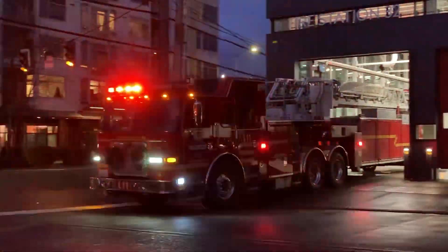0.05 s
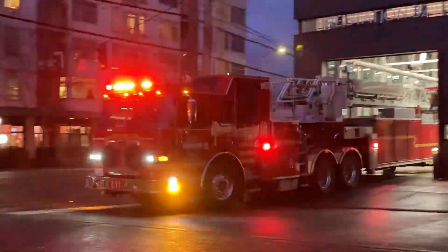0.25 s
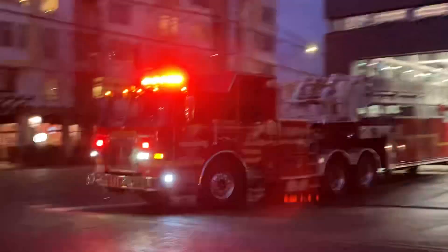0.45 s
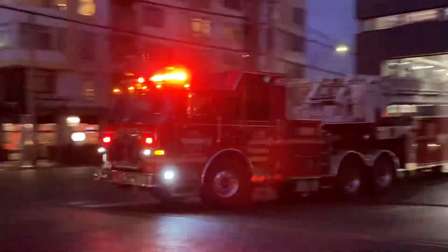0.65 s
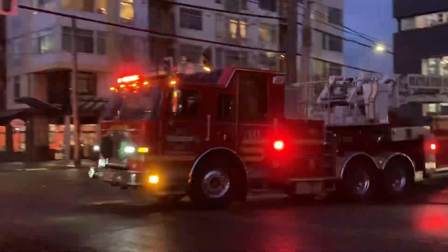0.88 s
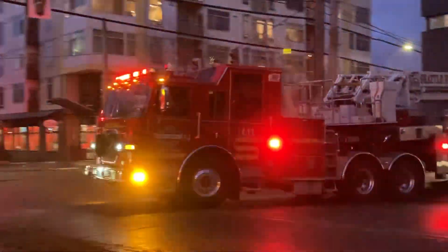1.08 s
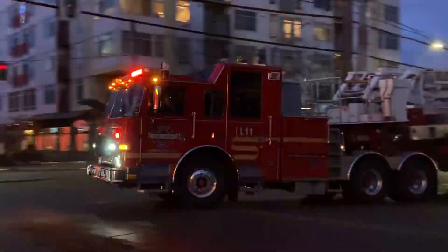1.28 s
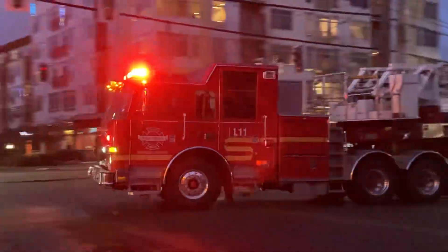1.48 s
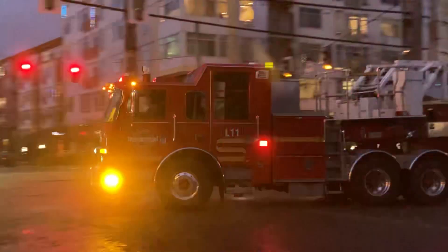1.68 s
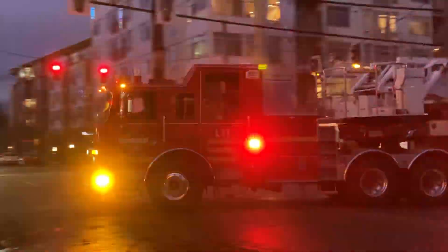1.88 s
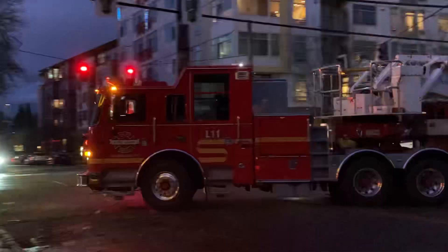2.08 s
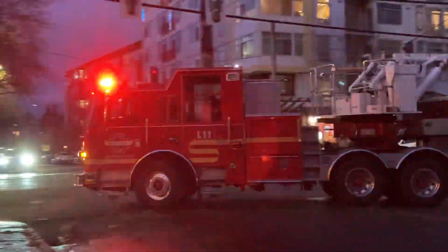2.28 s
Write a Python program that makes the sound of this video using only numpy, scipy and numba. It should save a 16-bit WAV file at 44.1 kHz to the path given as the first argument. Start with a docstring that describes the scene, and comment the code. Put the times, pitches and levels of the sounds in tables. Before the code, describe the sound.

Two short, loud fire truck horn honks echo over engine rumble and wet road hiss.

```python
"""Two short blasts on a chord of three air horns, the first opening with a squeak: a fire truck pulls out.
One air valve sets three reeds buzzing; they start sharp and raspy, and their clash makes the treble throb.
House fronts across the street throw each blast back. Underneath, the diesel rumbles and the tyres hiss
on the wet road, ducked by an automatic gain control whenever the horns sound."""
import sys
import numpy as np
from scipy import signal
from scipy.fft import rfft, irfft, next_fast_len
from scipy.io import wavfile
from scipy.ndimage import uniform_filter1d, map_coordinates
from numba import njit

SR = 44100
rng = np.random.default_rng(int(sys.argv[2]) if len(sys.argv) > 2 else 0)


def pcm_store(signal):
    """Save signal as 16-bit PCM."""
    levels = np.round(np.clip(np.atleast_2d(signal), -1, 1) * 32767)
    wavfile.write(sys.argv[1], SR, levels.astype(np.int16).T)


N = 108045
TOP_HZ = 15850

# horn cues: start/s, end/s, level/dB, attack/s, treble opening/s, left lead/ms, left over right/dB
BLAST_CUES = [(.236, .44, -12, 0.015, 0.025, 0.15, 2.5), (1.6, 1.88, -10, 0.02, 0.023, 0.408, 1.5)]
def horns():
    """Each blast arrives directly, off the house fronts, off road and cab, and as a wash down the street."""
    out = np.zeros((2, N))
    for i, (start, end, db, attack_s, open_s, lead_ms, left_db) in enumerate(BLAST_CUES):
        direct = amp(db) * placed(blast(i, start, end - start, attack_s, open_s), start)
        if i == 0:
            direct += squeak()
        out += panned(direct, lead_ms, left_db) + house_echoes(direct, i) + street_wash(direct)
    return out


RELEASE_S, ROUGH_S = .015, .11
THROB_HZ, THROB_DEPTH = 33, [.42, .24]  # one depth per blast
# lead horn's bend in each blast, sharp at first, sagging under full pressure: t/s, f/Hz
LEAD_BEND = [
    [(.25, 268.3), (.29, 265.4), (.33, 257.5), (.39, 253.3), (.45, 255.6)],
    [(1.62, 269), (1.65, 265), (1.69, 255), (1.75, 251), (1.815, 250.1), (1.875, 253.4), (1.9, 256.7)],
]
# lead horn's body, facing the listener in the first blast, side-on in the second: harmonic, level/dB
LEAD_BODY = [
    [(1, 0.5), (2, -3.5), (3, 0.5), (4, -9.5), (5, -15), (6, -27), (7, -21.5), (8, -16.5), (9, -8.5),
     (10, -10), (12, -16), (14, -16.5)],
    [(1, 1), (2, 0), (3, -3), (4, -9), (5, -11), (6, -14.5), (7, -12.5), (8, -12), (9, -16.5), (10, -15),
     (11, -17.5), (12, -27), (14, -22.5)],
]
# lead horn's top end: harmonic, level/dB
LEAD_TOP = [(16, -22), (20, -29.5), (23, -31), (28, -29.5), (33, -34.5), (37, -55), (44, -28.5), (62, -63)]
# bite of each blast: hiss/dB, share of opening blare and rasp, side horns' tilt/(dB per octave)
BITE = [(-14.5, 0.64, 0.3), (-21.5, 0.7, -0.17)]
def blast(i, start, length_s, attack_s, open_s):
    """One valve drives three reeds, rough at first; the clashing horns make the treble throb."""
    hiss_db, blare, tilt_db = BITE[i]
    t = np.arange(int((length_s + .15) * SR)) / SR
    closing = np.exp(-np.maximum(t - length_s, 0) / RELEASE_S)
    pressure = (1 - np.exp(-(t / attack_s) ** 2)) * closing
    opening = (1 - np.exp(-t / open_s)) * closing ** .19
    unrest = 1 + 4 * np.exp(-t / ROUGH_S)
    lead_hz = curve(LEAD_BEND[i], start + t)[0]
    lead_tone = list(LEAD_BODY[i]) + LEAD_TOP
    lead, lead_phase = reed(lead_hz, lead_tone, opening, unrest, blare, scatter_rad=.61)
    sides, high_phase = side_horns(i, t, opening, unrest, blare, tilt_db)
    chord = lead + sides + opening * sum_tones(i, lead_phase, high_phase)
    air = reed_air(t, lead_phase, amp(hiss_db) * opening * np.sqrt(unrest), blare)
    out = pressure * (chord + air)
    treble = filtered(out, lambda hz: along([(1000, 0), (2200, 1)], hz))
    return out + THROB_DEPTH[i] * np.cos(2 * np.pi * THROB_HZ * t) * treble


JITTER, FLUTTER = .0012, .15
BLARE_S, BUILD_S, DULL_HZ = .067, .035, 1500
# brassy lift on a starting reed, at full blare: f/Hz, boost/dB
BLARE_EQ = [(430, 2.5), (550, 6.5), (800, 4), (1050, 18.5), (1350, 7.5), (1600, 16), (1900, 3), (2200, 7),
            (3000, -3.5)]
def reed(hz, tone, opening, unrest, blare, scatter_rad):
    """A reed buzzes in fluttering harmonics on an unsteady pitch, dull while half open; gives sound, phase."""
    size = len(hz)
    t = np.arange(size) / SR
    phase = phase_of(hz * (1 + JITTER * unrest * wobble(174.2, size)))
    starting = blare * np.exp(-(t / BLARE_S) ** 2)
    out = np.zeros(size)
    for k in range(1, int(TOP_HZ / hz.mean())):
        harmonic_hz = k * hz.mean()
        gain = amp(along(tone, k) + starting * along(BLARE_EQ, harmonic_hz))
        gain *= opening ** (harmonic_hz / DULL_HZ)
        if k == 1:  # the lowest note takes time to build in the bell
            gain *= 1 - np.exp(-t / BUILD_S)
        flutter = FLUTTER * (unrest if k > 3 else 1) * wobble(45.4, size)
        offset = scatter_rad * min(k - 1, 1) * rng.normal()
        out += gain * (1 + flutter) * np.sin(k * phase + offset)
    return np.sqrt(2) * out, phase


SIDE_SHARP, SETTLE_S = .0078, .04
# colour of the low horn: harmonic, level/dB
LOW_TONE = [(1, -6), (2, -11.5), (3, -15), (4, -15.5), (5, -17), (7, -32.5), (11, -25.5), (18, -48),
            (30, -46), (70, -72)]
# colour of the high horn: harmonic, level/dB
HIGH_TONE = [(1, -26.5), (2, -18), (3, -18.5), (5, -28), (9, -23), (15, -38.5), (28, -36), (56, -77)]
# outer notes of the chord in each blast: low f/Hz, low level/dB, high f/Hz, high level/dB
SIDE_NOTES = [(215.3, -0.5, 281, -0.5), (213.9, 1.5, 282, -2.5)]
def side_horns(i, t, opening, unrest, blare, tilt_db):
    """Reeds below and above the lead start sharp and settle; gives their sound and the high one's phase."""
    low_hz, low_db, high_hz, high_db = SIDE_NOTES[i]
    sharp = 1 + SIDE_SHARP * np.exp(-t / SETTLE_S)
    out = np.zeros(len(t))
    for hz, db, tone in [(low_hz, low_db, LOW_TONE), (high_hz, high_db, HIGH_TONE)]:
        tilted = [(k, level + tilt_db * np.log2(k)) for k, level in tone]
        drift = 1 + .00303 * wobble(13.5, len(t))
        horn, phase = reed(hz * sharp * drift, tilted, opening, 1.21 * unrest, blare, scatter_rad=1.1)
        out += amp(db) * horn
    return out, phase


# sum tones: multiple of the lead horn, multiple of the high horn
SUM_MULTIPLES = [(1, 1), (1, 2), (2, 2), (4, 1)]
# their mix in each blast: level/dB per sum tone
SUM_MIX = [(2, 0, -12.5, -15.5), (0.23, -9.5, -21, -21)]
def sum_tones(i, lead_phase, high_phase):
    """The lead and high horns share their air and sound at sums of their harmonics."""
    return np.sqrt(2) * sum(amp(db) * np.sin(m * lead_phase + n * high_phase)
                            for (m, n), db in zip(SUM_MULTIPLES, SUM_MIX[i]))


RASP_DB, RASP_S = -8, .1
# colour of the air hiss: f/Hz, level/dB
HISS_EQ = [(200, -48), (700, 9), (1100, 8), (1600, -17), (2300, 13), (3200, 7.5), (4200, -2.5), (5600, -13),
           (7500, -10), (11000, -20), (16000, -30)]
# colour of the starting rasp: f/Hz, level/dB
RASP_EQ = [(250, -20), (900, -4), (2600, -2), (3200, -4), (4000, -6), (6000, -20), (15000, -40)]
def reed_air(t, phase, hiss_gain, blare):
    """Air puffs through the lead reed once a cycle: a hiss, with a rasp as it starts."""
    puffs = (1 + np.cos(phase)) ** 2
    hiss = unit(noise(HISS_EQ, len(t)) * puffs * amp(1.8 * wobble(42, len(t))))
    rasp = unit(noise(RASP_EQ, len(t)) * puffs) * blare * np.exp(-(t / RASP_S) ** 2)
    return hiss_gain * hiss + amp(RASP_DB) * rasp


SQUEAK_HZ, SCOOP_DEPTH, SCOOP_S = 807.4, .197, .00633
# swell and fade of the overblown reed: t/s, level/dB
SQUEAK_FADER = [(.217, -32), (.226, -4), (.236, 1), (.252, -3), (.27, -11), (.29, -28)]
# its nearly pure whistle: harmonic, level/dB
WHISTLE_TONE = [(1, 1.5), (2, -36), (3, -20), (4, -30), (6, -62), (8, -35), (10, -75)]
def squeak():
    """Before it catches, one reed whistles on the third resonance of its bell."""
    start, end = SQUEAK_FADER[0][0], SQUEAK_FADER[-1][0]
    t = np.arange(int((end - start) * SR)) / SR
    scoop = 1 - SCOOP_DEPTH * np.exp(-t / SCOOP_S)
    phase = phase_of(SQUEAK_HZ * scoop * (1 + .022 * wobble(450, len(t))))
    whistle = np.sqrt(2) * sum(amp(along(WHISTLE_TONE, k)) * np.sin(k * phase) for k in range(1, 10))
    return placed(whistle * amp(curve(SQUEAK_FADER, start + t)[0]), start)


# bands that colour the slapbacks: f/Hz
SLAP_BANDS = [255, 520, 780, 1030, 1400, 2300, 5000, 12000]
# slapbacks of each blast, one row per house front: delay/s, then level/dB in each band
SLAPBACKS = [
    [(.12, -7.5, -14.5, -16, -10, 5.5, -36, -4.5, -18), (.28, -23.5, -12.5, -25, -28, 2, -27, -22, -40),
     (.445, -15, -23, -16.5, -22, -10, -28.5, -19, -45), (.556, -31, -27, -27, -24, -29, -43, -42, -45)],
    [(.12, -6.5, -12, -6, 1, -5, -13, -0.5, -13.5), (.195, -35, -28, -16, -16, -11, -17, -26, -28),
     (.285, -23, -26, -23, -23, -25, -20, -23, -37), (.445, -29.5, -28, -37, -32, -30, -32, -34, -45)],
]
# low cut on every slapback: f/Hz, level/dB
SLAP_LOW_CUT = [(210, -8), (250, 0.5)]
def house_echoes(direct, i):
    """Each house front returns a late, coloured copy that reaches the right side first."""
    echoes = np.zeros(N)
    for delay_s, *wall_db in SLAPBACKS[i]:
        wall = list(zip(SLAP_BANDS, wall_db))
        late = placed(direct, delay_s)
        echoes += filtered(late, lambda hz: amp(along(wall, hz) + along(SLAP_LOW_CUT, hz)))
    return panned(echoes, lead_ms=-.26, left_db=1.5)


CLOSE_DB, STREET_DB = -12.5, -11
# the street's tail: f/Hz, time to fall 60 dB/s
STREET_DECAY = [(200, 0.68), (800, 1.22), (3000, 0.99), (6000, 1.28), (12000, 0.28)]
def street_wash(direct):
    """A bright splash off the road and cab, then a long tail down the street."""
    bright = filtered(direct, lambda hz: amp(along([(250, -1.5), (1500, 14.5), (6000, 10.5)], hz)))
    splash = reverb(bright, t60=[(200, .051), (10000, .029)], delay_s=.004)
    return amp(CLOSE_DB) * splash + amp(STREET_DB) * reverb(direct, STREET_DECAY, delay_s=.03)


# fader moves on the running truck: t/s, engine level/dB, road level/dB
TRUCK_FADERS = [(0, -29.5, -26), (.22, -28.5, -26), (.32, -33, -14.5), (.58, -37, -29), (.85, -30.5, -28),
                (1.05, -34.5, -32.5), (1.55, -33.5, -34.5), (1.8, -30.5, -25.5), (2.1, -32, -32.5),
                (2.45, -46.5, -41)]
def truck():
    """Engine and road noise swell and fade under the horns."""
    engine_db, road_db = curve(TRUCK_FADERS, np.arange(N) / SR)
    return diesel(engine_db) + wet_road(road_db)


FIRING_HZ, FIRING_DB = 76.7, -3
# colour of the engine rumble: f/Hz, level/dB
RUMBLE_EQ = [(18, -24), (30, -22), (42, 6.5), (52, -2), (72, -1.5), (100, 4), (150, -7), (200, -5.5),
             (300, -2), (600, -68)]
def diesel(level_db):
    """The diesel rumbles around a wavering firing note and its octave."""
    phase = phase_of(FIRING_HZ * (1 + .0789 * wobble(9.3, N)))
    firing = unit((np.sin(phase) + .96 * np.sin(2 * phase)) * amp(2.5 * wobble(18, N)))
    engine = unit(stereo_noise(RUMBLE_EQ) + amp(FIRING_DB) * firing)
    return amp(level_db + .81 * wobble(9.4, N)) * engine


# colour of the tyres and fan: f/Hz, level/dB
ROAD_EQ = [(60, -53), (160, -10), (350, -6), (520, 0.5), (1000, -6), (2000, -15), (4000, -22), (5700, -28),
           (7500, -28.5), (11500, -30.5), (15500, -41.5)]
def wet_road(level_db):
    """Tyres and fan hiss over the wet road, flickering slightly in level."""
    flicker_db = .7 * wobble(24.94, N)
    return amp(level_db + flicker_db) * panned(stereo_noise(ROAD_EQ), lead_ms=.45, left_db=1)


# stereo image of the running noise: f/Hz, left-right correlation
STEREO_IMAGE = [(60, 0.88), (250, 0.95), (600, 0.19), (1500, 0.13), (8000, 0.07)]
def stereo_noise(spectrum):
    """Coloured noise of rms 1, near mono in the bass and wide in the treble."""
    def mid_side(hz):
        width = np.arccos(np.clip(along(STEREO_IMAGE, hz), -1, 1)) / 2
        return amp(along(spectrum, hz)) * [np.cos(width), np.sin(width)]
    mid, side = filtered(rng.standard_normal((2, N)), mid_side)
    return unit(np.array([mid + side, mid - side]))


def noise(spectrum, size):
    """Coloured mono noise of rms 1."""
    return unit(filtered(rng.standard_normal(size), lambda hz: amp(along(spectrum, hz))))


def reverb(x, t60, delay_s):
    """Scattered reflections; each frequency dies at its own speed."""
    hz, t, bands = signal.stft(rng.standard_normal((2, SR + SR // 2)), SR, nperseg=256)
    decay = amp(-60 * t / along(t60, hz)[:, None])
    tail = signal.istft(bands * decay, SR, nperseg=256)[1]
    return signal.fftconvolve(placed(x, delay_s)[None], tail / np.linalg.norm(tail[0]), axes=1)[:, :N]


def panned(x, lead_ms, left_db):
    """The left side leads the right by lead_ms and is louder by left_db."""
    half = np.array([[.5], [-.5]])
    return filtered(x, lambda hz: amp(half * left_db) * np.exp(2j * np.pi * hz * half * lead_ms / 1000))


def filtered(x, response):
    """x through a frequency response."""
    size = x.shape[-1]
    padded = next_fast_len(size + 8192)
    return irfft(rfft(x, padded) * response(np.fft.rfftfreq(padded, 1 / SR)), padded)[..., :size]


def placed(x, s):
    """x starting at s seconds."""
    return np.pad(x, (max(round(s * SR), 0), N))[:N]


def wobble(rate, size):
    """A smooth random curve, rate knots a second."""
    return map_coordinates(rng.standard_normal(int(size * rate / SR) + 4), [np.arange(size) * rate / SR])


def along(points, hz):
    """Points read on a log axis."""
    knots, values = np.transpose(points)
    return np.interp(np.log(hz + .00095), np.log(knots), values)


def curve(rows, t):
    """Each column after the first, read at times t."""
    times, *columns = np.transpose(rows)
    return [np.interp(t, times, column) for column in columns]


def phase_of(hz):
    """Running phase of a moving pitch."""
    return 2 * np.pi * np.cumsum(hz) / SR


def amp(db):
    """Decibels to gain."""
    return 10 ** (np.asarray(db) / 20)


def unit(x):
    """Scaled to rms 1."""
    return x / np.sqrt(np.mean(x ** 2) + 1e-20)


def scene():
    """Horns over the running truck."""
    return horns() + truck()


LIMIT_DB, GRAB_S, HOLD_S, RECOVER_DB_PER_S = -11, .011, .091, 27
@njit
def overshoot(over_db):
    """Follows the dB above the limit: grabs quickly, holds, then lets go at a steady rate."""
    out, held_db, wait = np.zeros(len(over_db)), 0., 0.
    for i in range(len(over_db)):
        wait -= 1
        if over_db[i] > held_db - 3:
            wait = HOLD_S * SR
        if over_db[i] > held_db:
            held_db += (over_db[i] - held_db) / (GRAB_S * SR)
        elif wait < 0:
            held_db = max(held_db - RECOVER_DB_PER_S / SR, 0.)
        out[i] = held_db
    return out


def record(dry):
    """Gain control ducks the mix under the horns; peaks clip softly and the very top is cut."""
    power = np.abs(uniform_filter1d(np.mean(dry ** 2, axis=0), size=700)) + 1e-12
    ducked = dry * amp(-.95 * overshoot(10 * np.log10(power) - LIMIT_DB))
    clipped = ducked / (1 + np.abs(ducked / .95) ** 12) ** (1 / 12)
    return filtered(clipped, lambda hz: hz < TOP_HZ)


dry = scene()
out = record(dry)
pcm_store(out)
```